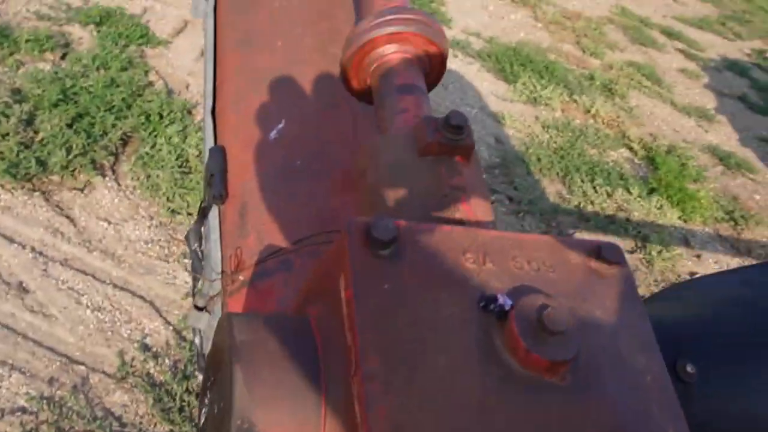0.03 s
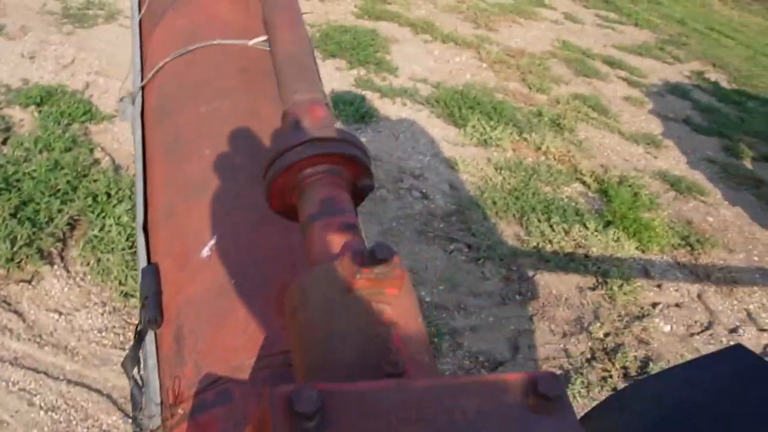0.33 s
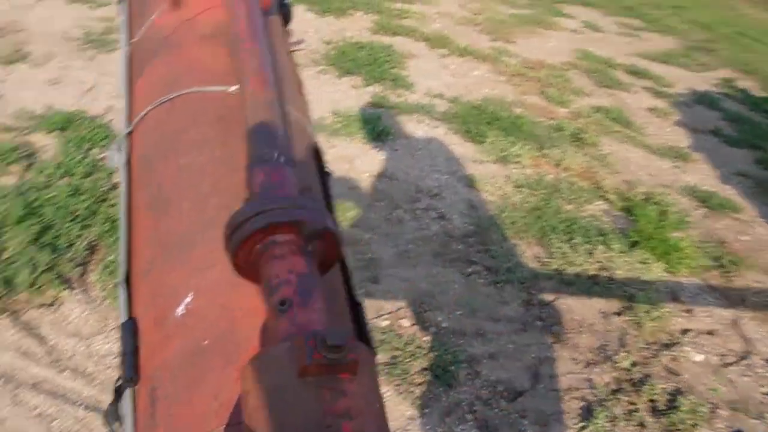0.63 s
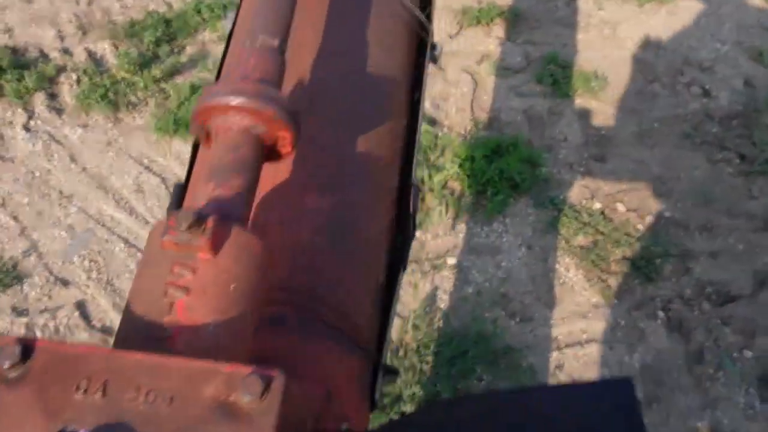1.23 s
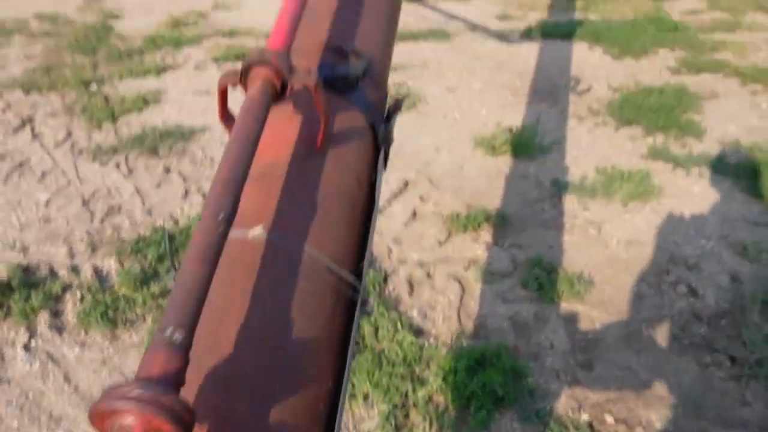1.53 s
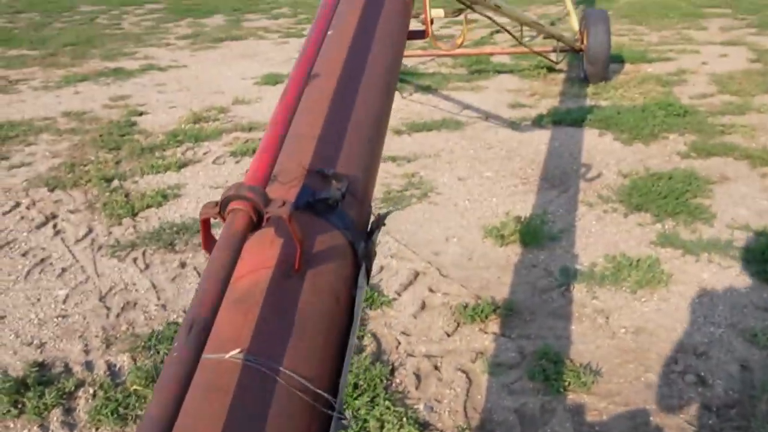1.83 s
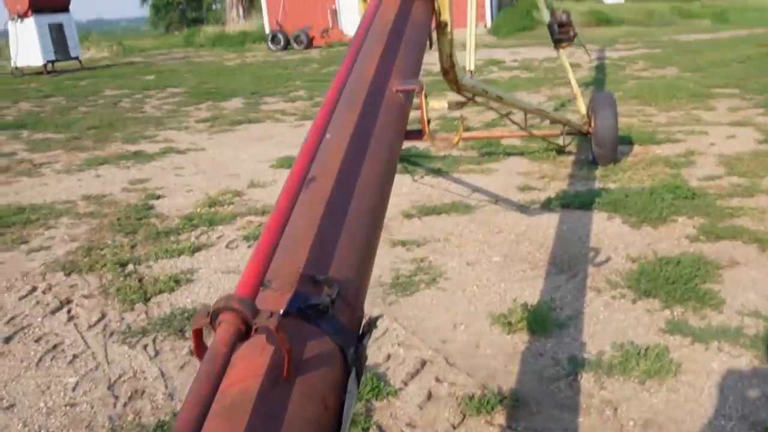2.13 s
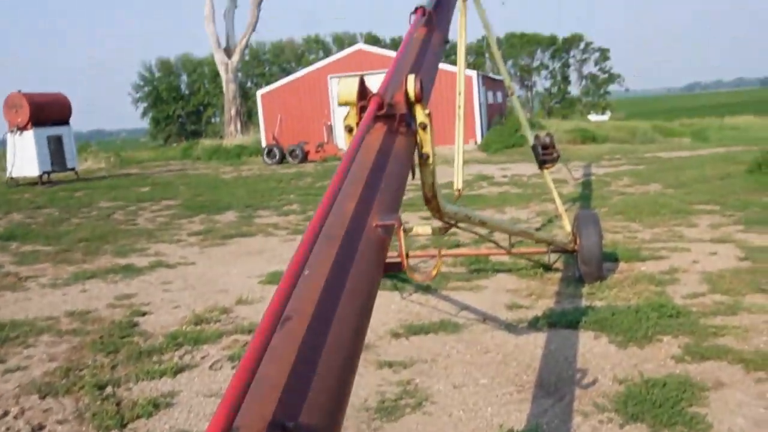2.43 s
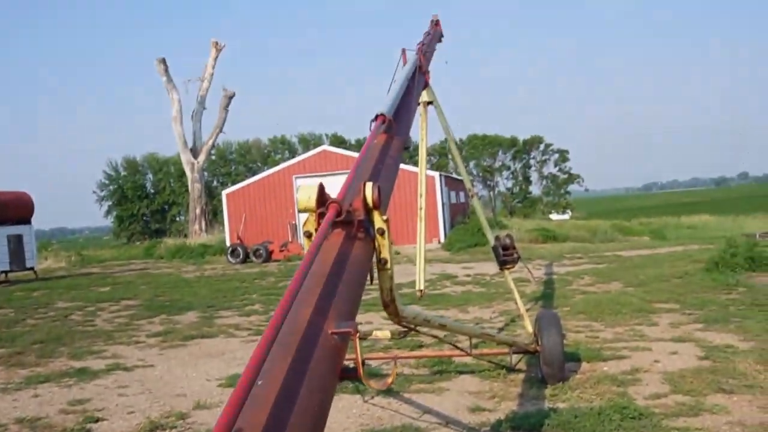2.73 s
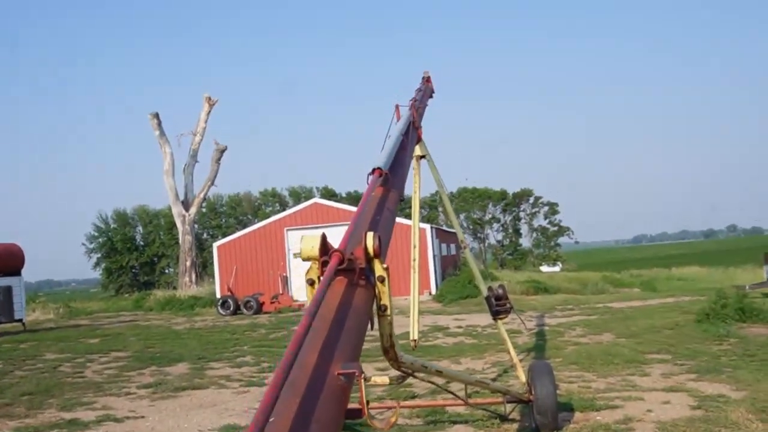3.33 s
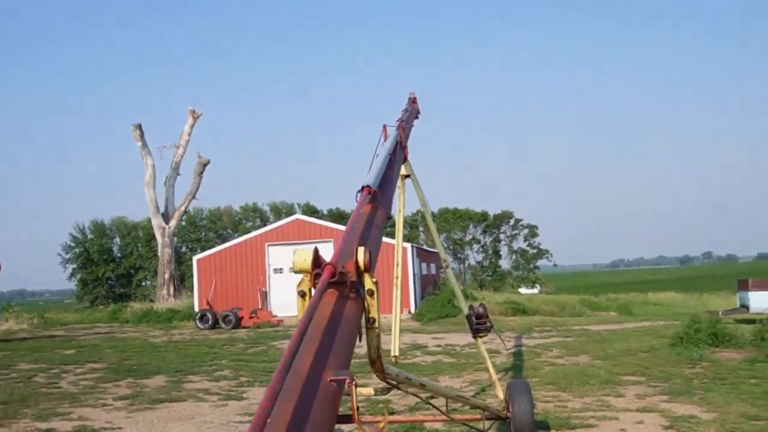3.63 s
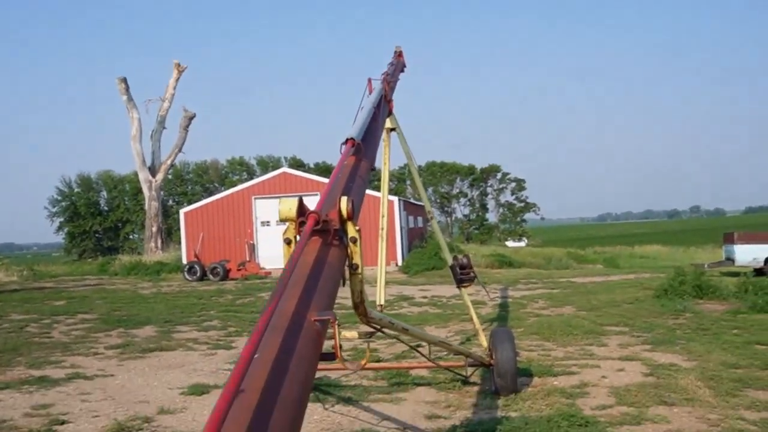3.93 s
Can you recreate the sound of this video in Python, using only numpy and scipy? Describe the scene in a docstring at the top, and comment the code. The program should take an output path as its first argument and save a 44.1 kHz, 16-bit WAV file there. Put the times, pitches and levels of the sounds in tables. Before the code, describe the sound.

A grain auger runs close by with a loud, rattling metallic roar for all four seconds. Hissing scrapes and short high squeals, mostly on the left, crowd the first second and thin out by 1.8 seconds. Hollow grinding comes from 0.7 to 1.6 seconds. From about one second, steel clashes roughly four times a second, with another brief squeal near 2.9. Small ticks and a faint engine hum continue throughout.

```python
"""Steel scrapes and squeals over a rattling roar: a grain auger running nearly empty, heard up close.
Dense knocks from the turning screw ring its steel tube, with a clash about once a turn.
Where the screw rubs the wall it hisses, catches on a pitch or grinds hollowly.
Tube notes swell, loose parts tick and an engine hums faintly; a fast gain control ducks loud moments."""
import sys
import numpy as np
from scipy import signal
from scipy.fft import rfft, irfft, next_fast_len
from scipy.io import wavfile
from scipy.ndimage import uniform_filter1d, map_coordinates

SR = 44100
rng = np.random.default_rng(int(sys.argv[2]) if len(sys.argv) > 2 else 0)


def generate_wav(signal):
    """Clip the signal to [-1, 1] and save it as 16-bit WAV at the path in sys.argv[1]."""
    frames = np.transpose(np.atleast_2d(signal))
    scaled = np.clip(frames, -1, 1) * 32767
    pcm = np.round(scaled).astype(np.int16)
    wavfile.write(sys.argv[1], SR, pcm)


N = 176400
TIME = np.arange(N) / SR
TOP_HZ = 15760

# The tone of the roar. Each row: frequency in Hz, relative level in dB.
ROAR_COLOUR = [(20, -47), (60, -31), (110, -26), (165, -15.5), (250, -11.5), (340, -5), (480, -6),
               (580, -6), (1000, -1.5), (1240, -2.5), (1600, -1), (1950, -1.5), (2200, 1.5), (3100, -0.5),
               (3500, -0.5), (5300, -4.5), (7500, -10), (10400, -19.5), (13500, -25), (15500, -36.5)]
# The tube's broad resonances. Each row: centre in Hz, width in Hz, boost in dB.
TUBE_MODES = [(195, 21, 2.5), (363, 32, 3), (472, 40, 4), (718, 140, 3.5), (1034, 51, 1.5),
              (1788, 170, 4.5), (2200, 67, 2.6), (2670, 450, 2)]
# The steel's thin, high shimmer. Each row: centre in Hz, width in Hz, boost in dB.
SHIMMER_MODES = [(12890, 45, 3), (13096, 40, 6), (13288, 30, 7), (13486, 45, 6), (13910, 60, 4)]
# Where roar, grinding and ticks sit in stereo. Each row: frequency in Hz, left over right in dB.
TUBE_PAN = [(250, -3), (700, 0.5), (1300, -1.7), (2400, -2.5), (4400, 2.5), (7500, 7), (11000, 0),
            (15000, 1)]
# Fader moves on the roar. Each row: time in seconds, then bass, body and treble gain in dB.
ROAR_FADERS = [(0, -3, 2, 6), (.1, -7, -6, 3), (.31, -6, -4.5, -1), (.39, -8, -9, 6), (.44, -7, -5.5, 2),
               (.55, -5, 3, 5), (.6, -10, -2.5, -3), (.74, -7.5, -0.5, -5), (.77, -10, -10, -5),
               (.82, -7, -2.5, -2), (1.16, -6, -5, -2.5), (1.2, -7, -7, 0), (1.28, -11, -6.5, -1),
               (1.35, -5, -5.5, 0), (1.58, -1, -1.5, 7.5), (1.77, -8, -5, -3), (1.85, -1.5, -1, 1.5),
               (2.1, 2.5, 1.5, 3.5), (2.4, 1, 1, 4), (2.48, 0.5, -1.5, 1.5), (2.61, 2.5, 0, 4.5),
               (2.8, -1.5, -3, 1.5), (2.91, 6.5, 1, 4), (2.94, -4, -0.5, 4), (2.99, -4, -7, -1.5),
               (3.1, 0.5, -2.5, 4), (3.65, -0.5, -1.5, 3), (4, 1, -2, 2.5)]
# The screw clashes against the tube. Each row: start in seconds, relative strength.
CLASHES = [(1.07, 0.94), (1.31, 0.69), (1.48, 0.25), (1.836, 1.13), (2.082, 1.2), (2.355, 0.79),
           (2.609, 0.72), (2.871, 0.71), (3.137, 1.1), (3.285, 0.32), (3.399, 1.3), (3.624, 2.1),
           (3.673, 1.1), (3.927, 1.8)]
BASS_HZ, TREBLE_HZ, ROAR_DB, CLASH_DECAY_S = 476, 4650, -12.5, 0.02


def roar():
    """Dense knocks of the screw ring the tube and swell at each clash."""
    def tube(f):
        modes = sum((amp(db) - 1) * 1j * f * width / (hz * hz - f * f + 1j * f * width)
                    for hz, width, db in TUBE_MODES + SHIMMER_MODES)
        return amp(along(ROAR_COLOUR, f)) * (1 + modes)

    sound = unit(stereo(filtered(rattle(patchy_db=1.4), tube), TUBE_PAN))
    bass = filtered(sound, lambda f: 1 / (1 + (f / BASS_HZ) ** 4))
    treble = filtered(sound, lambda f: 1 - 1 / (1 + (f / TREBLE_HZ) ** 4))
    body = sound - bass - treble
    clash = sum(strength * (TIME > start) * np.exp(-np.abs(TIME - start) / CLASH_DECAY_S)
                for start, strength in CLASHES)
    clash = uniform_filter1d(clash, size=200)  # soften the attacks
    clash -= clash.mean()
    times, bass_db, body_db, treble_db = np.transpose(ROAR_FADERS)

    def ride(fader_db, clash_db, sway_db):
        return amp(ROAR_DB + np.interp(TIME, times, fader_db) + clash_db * clash + sway_db * wobble(45))

    return (bass * ride(bass_db, clash_db=7.5, sway_db=1.5)
            + body * ride(body_db, clash_db=7.5, sway_db=0.88)
            + treble * ride(treble_db, clash_db=10.5, sway_db=2.1))


# The bright tone of a scrape. Each row: frequency in Hz, relative level in dB.
SCRAPE_COLOUR = [(60, -90), (300, -42), (1500, -14.5), (3200, -5), (4200, 0.5), (5200, 4.5), (5900, 0),
                 (6500, 1), (8000, -5.5), (10000, -15), (12500, -26.5), (15500, -51)]
# Scrapes and squeals sit mostly left. Each row: frequency in Hz, left over right in dB.
RUB_PAN = [(2500, 0), (4000, -6), (5000, 10), (6500, 13), (9000, 15), (13000, 3)]
# The screw drags along the wall. Each row: start in seconds, length in seconds, relative level in dB.
SCRAPES = [(-.02, .28, -4.5), (0.265, 0.12, -9), (0.361, .05, -11), (0.415, 0.077, -4.5),
           (0.479, 0.093, -6), (0.573, 0.042, -7.5), (0.625, 0.14, -7.5), (.752, 0.052, -13),
           (0.814, 0.16, -13), (0.974, .012, -12), (1.008, 0.036, -9), (1.182, 0.031, -7),
           (1.249, 0.031, -7), (1.591, 0.074, -8.5), (1.672, .06, -13), (1.79, .014, -14),
           (2.923, 0.038, -11)]


def scrapes():
    """Steel drags on steel: a rough hiss whose resonances keep shifting."""
    noise = patchy_noise(patchy_db=4.5, bins=3, frames=4)
    hiss = unit(stereo(coloured(noise, SCRAPE_COLOUR), RUB_PAN))
    roughness = amp(2 * wobble(140) - 2.5)
    return hiss * roughness * strokes(SCRAPES)


# The rubbing edge catches and sings. Each row: start in seconds, length in seconds, pitch in Hz,
# relative level in dB, roughness (0 holds a steady pitch).
SQUEALS = [(.03, .09, 5200, -8, 0.9), (.085, 0.18, 2408, -19, 1), (.125, .022, 2450, -8.5, 0.3),
           (.13, 0.028, 5000, -11, 0.9), (.15, 0.048, 6340, -7, 0.5), (.16, 0.087, 2078, -12.5, 0.92),
           (.243, 0.023, 2535, -15, 0.27), (.252, 0.021, 5080, -9, 0.7), (.272, 0.017, 5600, -13, .5),
           (.285, 0.052, 6180, -11, 0.9), (.33, 0.041, 6400, -7, .6), (.375, 0.036, 5160, -7, 0.5),
           (.378, .02, 4760, -5, 0.7), (0.402, .09, 4190, -15, .5), (.425, .04, 6330, -17, 0.65),
           (.456, 0.032, 2080, -12, 0.54), (.473, 0.024, 2290, -10, 0.48), (.498, 0.032, 5230, -7, .65),
           (.532, .042, 4720, -4.5, .7), (.546, 0.026, 5180, -3, 0.6), (.578, .036, 5130, -5, 0.7),
           (.605, .016, 6330, -12, .6), (.748, 0.031, 4850, -8, 0.64), (.908, .022, 6400, -14.5, .3),
           (.974, .016, 5120, -4, .4), (.978, 0.033, 5520, -8, .4), (1.014, .018, 4000, -12, .6),
           (1.014, .02, 5000, -13, 0.64), (1.033, .014, 4740, -8, .6), (1.178, 0.016, 4880, -9, 0.5),
           (1.193, 0.019, 4660, -6, 0.83), (1.593, 0.034, 2286, -13, 0.1), (1.6, .05, 7670, -11, 1.1),
           (1.628, .028, 6750, -12, 0.42), (1.648, 0.027, 2250, -18, .2), (1.728, 0.019, 5500, -16, 0.4),
           (2.923, 0.033, 2282, -8, 0.3)]
SQUEAL_WANDER, SQUEAL_JITTER = .012, .038  # shares of the pitch at roughness 1
SQUEAL_DB, FLUTTER_DB, SECOND_HARMONIC_DB, THIRD_HARMONIC_DB = -4, 3.5, -17.5, -10


def squeals():
    """Stick and slip locks briefly onto one pitch; the steel favours overtones in its scraping range."""
    out = np.zeros((2, N))
    sides = np.array([[.5], [-.5]])
    waver = SQUEAL_WANDER * wobble(60) + SQUEAL_JITTER * wobble(900)
    flutter = amp(FLUTTER_DB * wobble(170))
    attack_s, release_s = 0.0072, 0.0063
    for start, length, hz, db, roughness in SQUEALS:
        on = (TIME > start) & (TIME < start + length + 8 * release_s)
        envelope = contact(TIME[on] - start, length, attack_s, release_s) * flutter[on]
        phase = 2 * np.pi * np.cumsum(hz * (1 + roughness * waver[on])) / SR
        for k, harmonic_db in enumerate([0, SECOND_HARMONIC_DB, THIRD_HARMONIC_DB], start=1):
            if k * hz < TOP_HZ:
                pan = amp(sides * along(RUB_PAN, k * hz))
                tone = unit(pan * np.sin(k * phase - sides * along(LEFT_LAG, k * hz)))
                colour_db = along(SCRAPE_COLOUR, k * hz) - along(SCRAPE_COLOUR, hz)
                out[:, on] += tone * envelope * amp(db + SQUEAL_DB + harmonic_db + colour_db)
    return out


# The hollow tone of the grinding. Each row: frequency in Hz, relative level in dB.
GRIND_COLOUR = [(30, -50), (110, -23), (175, -15.5), (400, -4), (560, -2.5), (740, 5.5), (880, -8),
                (1050, 3), (1300, 2), (1900, 5.5), (2400, 5.5), (3500, 1.5), (6000, -0.5), (10000, -16),
                (15500, -42)]
# Grinding strokes. Each row: start in seconds, length in seconds, level in dB.
GRINDS = [(0.666, 0.08, -12), (0.795, .18, -14), (1.049, 0.111, -17.5), (1.298, .12, -15.5),
          (1.467, 0.15, -13.5)]


def grinding():
    """The screw judders along the wall in strokes that make the tube sound hollow."""
    judder = coloured(rattle(patchy_db=1.0), GRIND_COLOUR)
    return unit(stereo(judder, TUBE_PAN)) * strokes(GRINDS)


# Notes that stand out of the roar. Each row: start in seconds, length in seconds, centre in Hz,
# half width in Hz, level in dB.
TUBE_NOTES = [(0.725, 0.037, 1045, 35, -14.5), (.83, 0.16, 1950, 280, -19.5), (1.048, .1, 770, 90, -27.5),
              (1.29, 0.34, 763, 100, -26.5), (1.328, 1.05, 224, 60, -44), (2.28, 0.087, 1760, 45, -28),
              (2.48, 0.064, 2660, 50, -23), (2.525, 0.055, 2280, 50, -23), (2.57, 0.057, 1810, 40, -20),
              (2.63, 0.097, 2670, 90, -21.5), (2.962, 0.089, 2295, 35, -23.5), (3.02, .07, 2590, 60, -23),
              (3.04, 1.2, 488, 110, -31.5), (3.14, 0.26, 2760, 60, -25.5), (3.253, 0.066, 2850, 200, -22),
              (3.62, .12, 1770, 50, -22)]


def tube_notes(fade_s=0.021):
    """Single notes of the knocked tube swell and fade, each a narrow band of noise."""
    out = np.zeros(N)
    for start, length, hz, half_width, db in TUBE_NOTES:
        note = filtered(rng.standard_normal(N), lambda f: 1 / (1 + ((f - hz) / half_width) ** 4))
        fade = np.clip(np.minimum(TIME - start, start + length - TIME) / fade_s, 0, 1)
        out += unit(note) * amp(db) * fade
    return out


# The tone of small metal ticks. Each row: frequency in Hz, relative level in dB.
TICK_COLOUR = [(60, -56), (400, -3), (1500, -4.5), (4000, 2), (8000, 7), (11000, -2.5), (15500, -29)]
TICKS_PER_S, TICK_DECAY_S, TICK_SPREAD_DB, TICK_DB = 28, 0.002, 6, -29.5


def ticks():
    """Loose steel parts tick sharply at random, and at every clash."""
    hits = (rng.random(N) < TICKS_PER_S / SR) * amp(TICK_SPREAD_DB * rng.standard_normal(N))
    for start, strength in CLASHES:
        hits[round(start * SR)] += 2 * strength
    bursts = ring_out(hits, TICK_DECAY_S) * rng.standard_normal((2, N))
    return unit(stereo(coloured(bursts, TICK_COLOUR), TUBE_PAN)) * amp(TICK_DB)


# The engine's hum. Each row: multiple of the shaft rate, relative level in dB.
ENGINE_ORDERS = [(2, -69), (3, -59), (4, -56), (5, -54.5), (6, -58)]
SHAFT_HZ = 21.7


def engine():
    """Low orders of the shaft make a soft, unsteady throb that follows the roar's bass fader."""
    phase = 2 * np.pi * np.cumsum(SHAFT_HZ * (1 + 0.0024 * wobble(2.7))) / SR
    hum = sum(amp(db + 1.6 * wobble(6)) * np.sin(k * phase) for k, db in ENGINE_ORDERS)
    times, bass_db = np.transpose(ROAR_FADERS)[:2]
    return hum * amp(1.4 * np.interp(TIME, times, bass_db))


def rattle(patchy_db, knocks_per_s=490, spread_db=4, knock_share=0.49, decay_s=0.0048):
    """Overlapping knocks on steel: brief bursts of noise over a steady bed."""
    hits = (rng.random(N) < knocks_per_s / SR) * amp(spread_db * rng.standard_normal(N)) ** 2
    power = ring_out(hits, decay_s)
    envelope = np.sqrt(1 - knock_share + knock_share * power / power.mean())
    return patchy_noise(patchy_db, bins=2, frames=9) * envelope


def patchy_noise(patchy_db, bins, frames):
    """Two noises whose resonances come and go at random, in patches of bins by frames."""
    spectra = signal.stft(rng.standard_normal((2, N)), nperseg=512)[2]
    patches = uniform_filter1d(rng.standard_normal(spectra.shape[1:]), bins, axis=0)
    patches = uniform_filter1d(patches, frames, axis=1)
    return unit(signal.istft(spectra * amp(patchy_db * unit(patches)), nperseg=512)[1][:, :N])


def contact(age, length, attack_s=0.0067, release_s=0.0076):
    """Rubbing contact builds, holds and lets go."""
    return np.clip(age / attack_s, 0, 1) * np.exp(-np.maximum(age - length, 0) / release_s)


def strokes(rows):
    """One gain curve for a series of rubs."""
    return sum(amp(db) * contact(TIME - start, length) for start, length, db in rows)


def ring_out(hits, decay_s):
    """Give each hit an exponential tail."""
    return signal.lfilter([1], [1, -np.exp(-1 / (decay_s * SR))], hits)


# How alike left and right sound. Each row: frequency in Hz, correlation.
LIKENESS = [(140, .9999), (300, .9975), (600, .979), (1400, .905), (3100, .76), (5000, .48), (7000, .31),
            (15000, .42)]
# How far left trails right. Each row: frequency in Hz, phase in radians.
LEFT_LAG = [(300, 0), (1300, 0.037), (2700, 0.35), (4000, 0.93), (5600, 2.3), (7200, 0.2), (15000, 0)]


def stereo(pair, pan):
    """Blend two unrelated signals into left and right, narrow in the bass and wide in the treble."""
    def spread(hz):
        angle = np.arccos(along(LIKENESS, hz)) / 2
        return np.array([np.cos(angle), np.sin(angle)])

    def lean(hz):
        left = amp(along(pan, hz) / 2) * np.exp(-.5j * along(LEFT_LAG, hz))
        return np.array([left, 1 / left])

    mid, side = filtered(pair, spread)
    return filtered(np.array([mid + side, mid - side]), lean)


def coloured(x, colour):
    """Equalise x with a curve of (Hz, dB) points."""
    return filtered(x, lambda hz: amp(along(colour, hz)))


def filtered(x, response):
    """Filter x by a complex response of frequency."""
    size = next_fast_len(N + SR // 2)
    return irfft(rfft(x, size) * response(np.fft.rfftfreq(size, 1 / SR)), size)[..., :N]


def along(points, hz):
    """Read (Hz, value) points on a log frequency axis."""
    freqs, values = np.transpose(points)
    return np.interp(np.log(hz + 1), np.log(freqs + 1), values)


def wobble(rate):
    """A smooth random curve, rate knots a second."""
    return map_coordinates(rng.standard_normal(int(N * rate / SR) + 4), [TIME * rate])


def amp(db):
    """Decibels to gain."""
    return 10 ** (np.asarray(db) / 20)


def unit(x):
    """Scale to rms 1."""
    return x / np.sqrt(np.mean(x ** 2) + 1e-20)


def scene():
    """The auger and its engine."""
    return roar() + tube_notes() + ticks() + grinding() + scrapes() + squeals() + engine()


THRESHOLD_DB, DUCK_SLOPE, SENSE_S, RECOVER_DB_PER_S, CEILING = -13.5, 0.66, 0.0055, 204, .95


def record(dry):
    """Fast gain control ducks loud moments and recovers; peaks are rounded and the very top is cut."""
    power = np.abs(uniform_filter1d(dry ** 2, size=int(SENSE_S * SR), axis=1)).max(axis=0)
    duck_db = DUCK_SLOPE * 5 * np.log10(1 + (power / amp(THRESHOLD_DB) ** 2) ** 2)  # soft knee
    recovery = RECOVER_DB_PER_S * TIME
    held_db = np.maximum.accumulate(duck_db + recovery) - recovery
    ducked = dry * amp(-held_db)
    rounded = ducked / (1 + np.abs(ducked / CEILING) ** 10) ** (1 / 10)
    return filtered(rounded, lambda hz: hz < TOP_HZ)


dry = scene()
out = record(dry)
generate_wav(out)
```